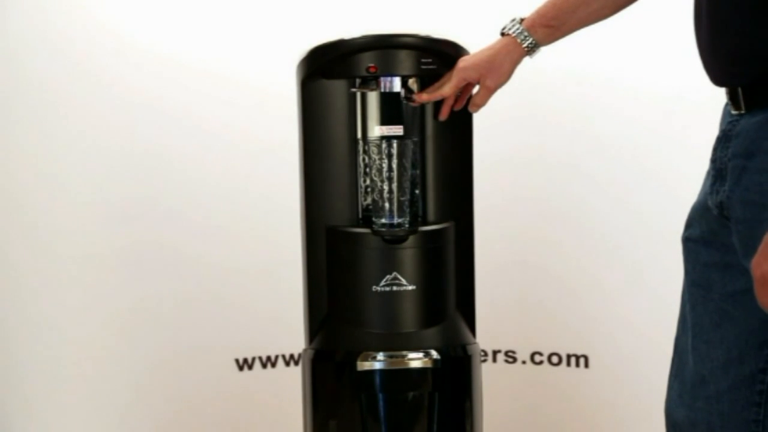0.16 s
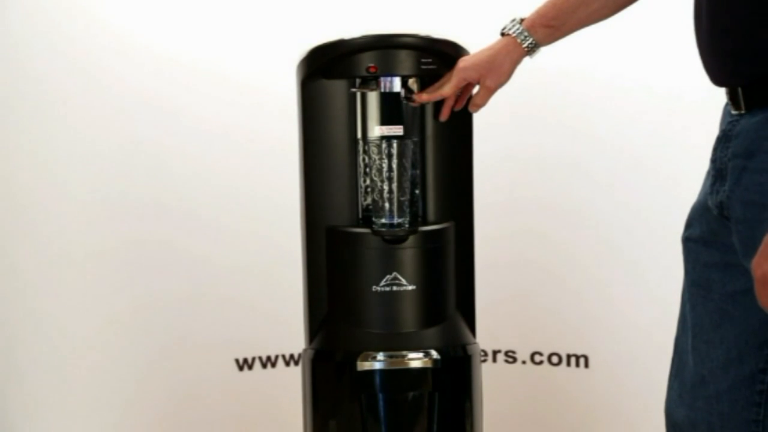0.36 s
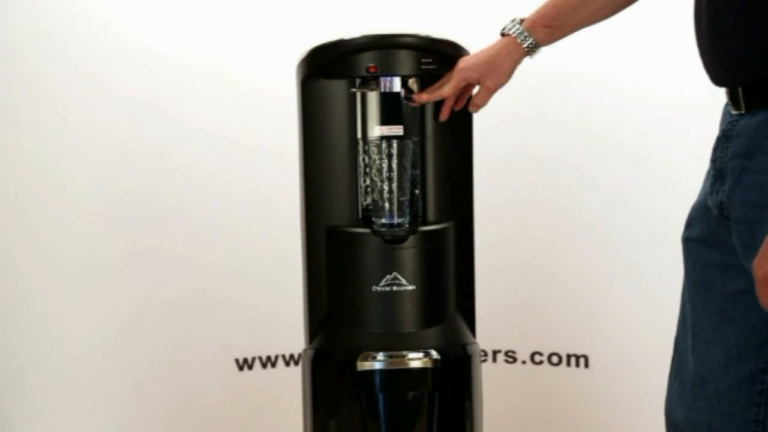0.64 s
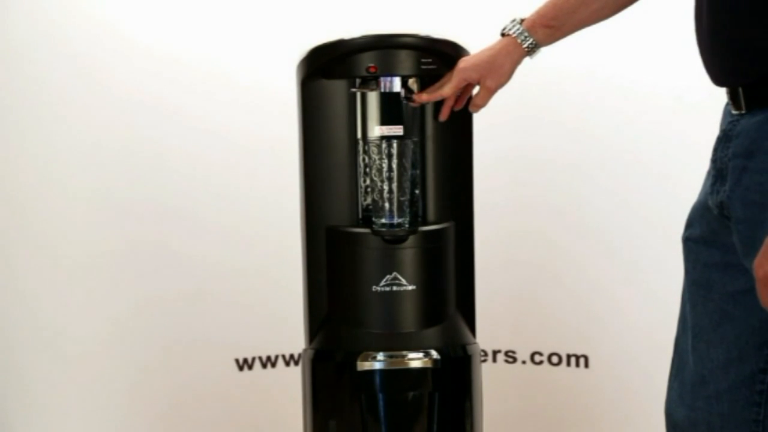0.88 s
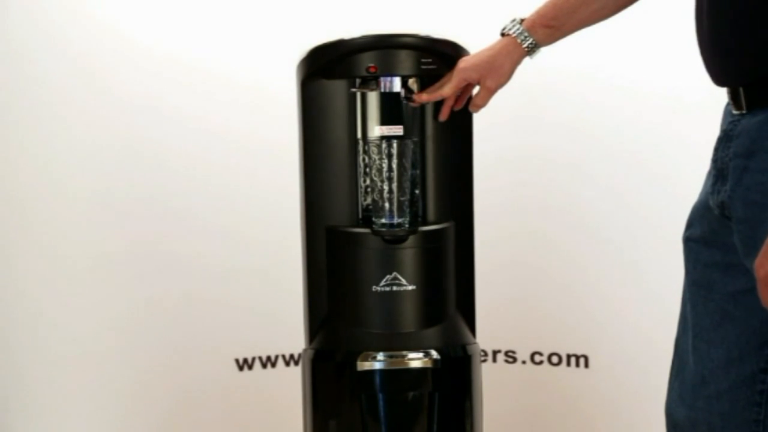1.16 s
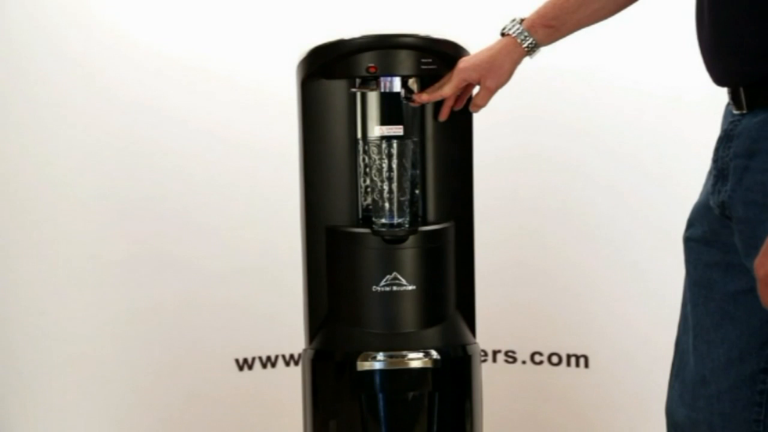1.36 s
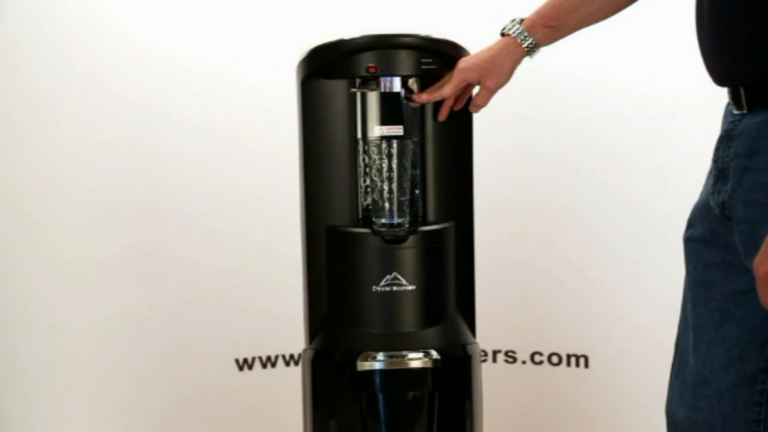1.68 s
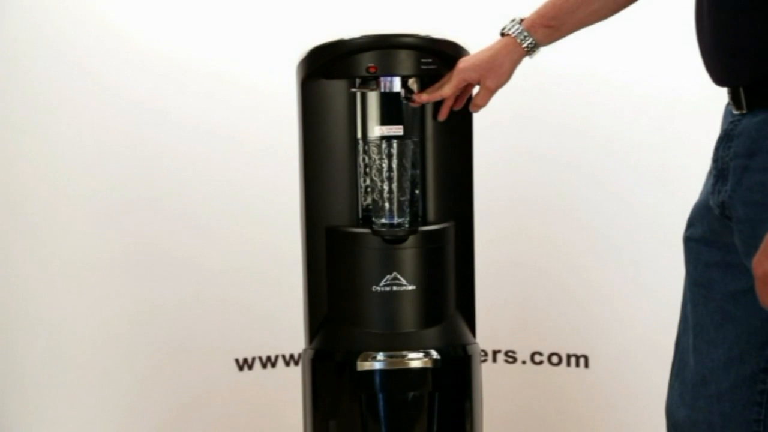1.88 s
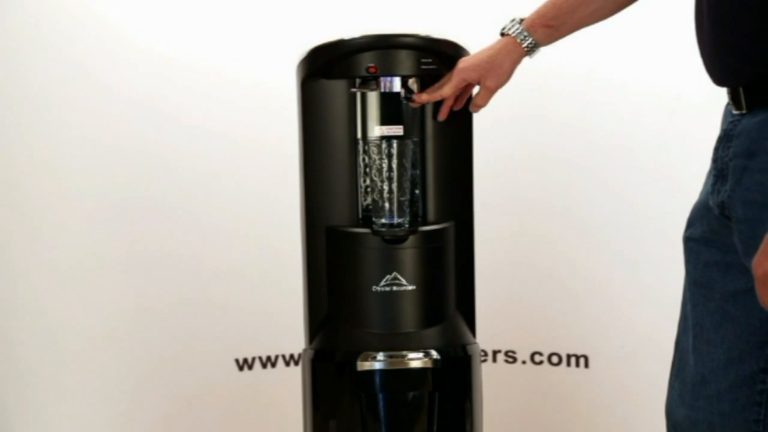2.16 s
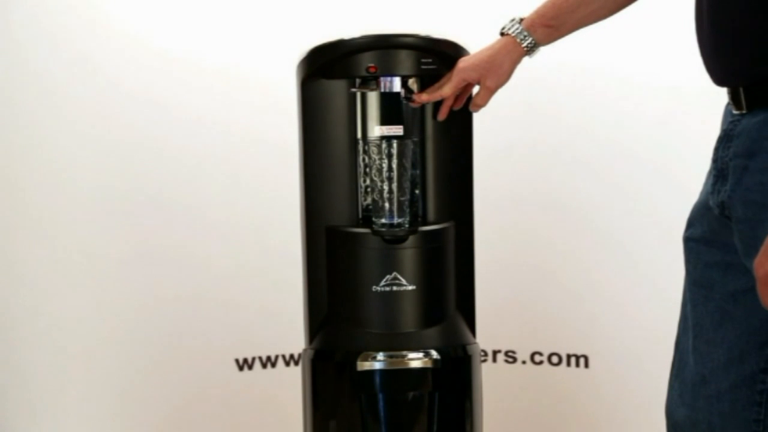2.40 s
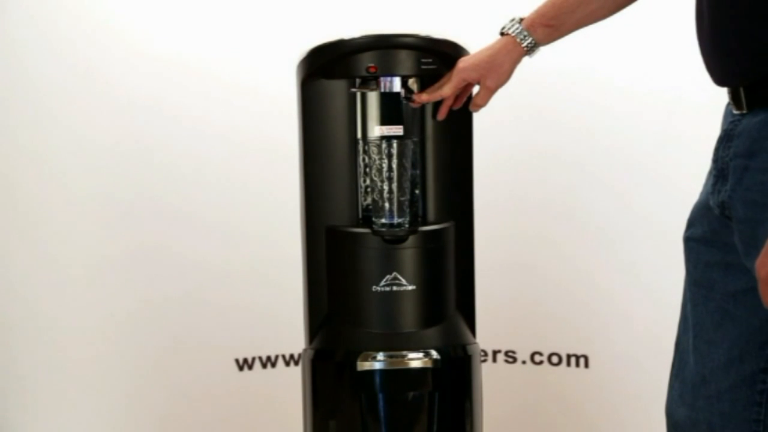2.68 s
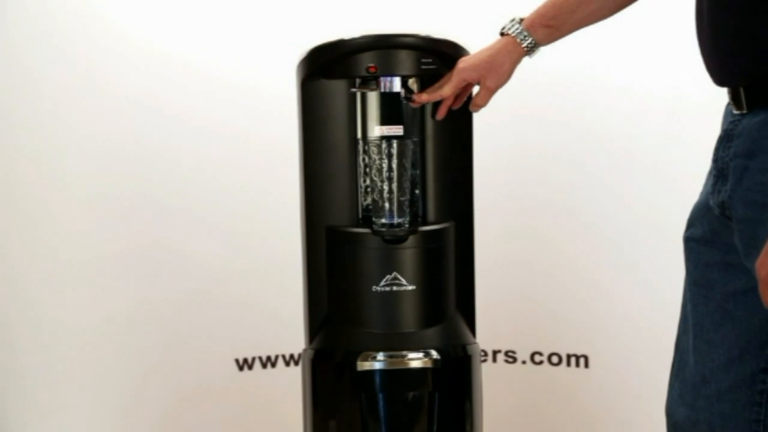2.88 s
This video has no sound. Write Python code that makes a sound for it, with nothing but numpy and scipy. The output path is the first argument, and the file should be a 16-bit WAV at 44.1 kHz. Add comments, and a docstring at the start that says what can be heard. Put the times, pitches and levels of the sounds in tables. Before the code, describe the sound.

A water cooler's electric pump hums steadily with a fast chugging buzz and a whine that keeps swelling and dipping. Underneath, a thin stream of water runs into a glass, fizzing softly with a few tiny splashes.

```python
"""The electric pump of a water cooler runs steadily while a thin stream fills a glass.
Its strokes, 25 a second, are a periodic force that drives the cabinet at harmonics of the stroke rate.
The motor whines in swells over faint steady tones and mains hum. Water rushes through the pump
and fizzes in the glass, where each bubble rings as a damped oscillator and the stream
throws a few small splashes. Both channels carry the same sound."""
import sys
import numpy as np
from scipy import signal
from scipy.fft import rfft, irfft
from scipy.io import wavfile
from scipy.ndimage import uniform_filter1d

SR = 44100
rng = np.random.default_rng(int(sys.argv[2]) if len(sys.argv) > 2 else 0)


def waveform_to_disk(signal):
    """Save audio, clipped to [-1, 1], as 16-bit WAV at the path in sys.argv[1]."""
    frames = np.transpose(np.atleast_2d(signal))
    scaled = np.clip(frames, -1, 1) * 32767
    samples = np.round(scaled).astype(np.int16)
    wavfile.write(sys.argv[1], SR, samples)


N = 134064

# Spray from the stream. Each row: start in seconds, level in dB before the envelope, band centre in Hz.
SPLASHES = [(.488, -53, 5300), (.773, -39.5, 3400), (1.134, -42, 4700), (1.162, -51, 4700),
            (1.211, -53, 5900), (1.883, -49, 5400), (1.918, -54, 5400), (2.952, -47, 5300)]
# Spectrum of the flow. Each row: frequency in Hz, relative spectral density in dB.
RUSH_SPECTRUM = [(20, -30.2), (45, -20), (75, -11.7), (105, -13.3), (150, -13.5), (240, -4), (330, -4.5),
                 (420, -7), (490, -6), (620, -.8), (820, -2.5), (890, .3), (980, -5), (1270, -5.5),
                 (1330, -4), (1410, -6), (1490, -12.8), (1750, -15), (2350, -12.8), (2850, -20.4),
                 (4050, -24.4), (4250, -27.4), (7000, -31.4), (10000, -35.5), (14000, -41.5)]
# Steady mains and motor tones. Each row: frequency in Hz, level in dB.
MOTOR_TONES = [(120, -57), (1086, -54), (1224, -47.5), (1410, -57), (1567, -65), (1902, -63), (1970, -59.5),
               (2449, -63)]
# Swells of the whine. Each row: centre in seconds, length in seconds, relative height in dB.
WHINE_SWELLS = [(.10, .2, -.5), (.24, .09, -6), (.54, .2, 1), (.88, .25, .3), (1.26, .19, .7),
                (1.64, .26, -1.5), (1.91, .16, 1), (2.16, .17, -1.5), (2.39, .16, 1), (2.66, .2, -1.5),
                (2.915, .17, 0)]
# Speed of the pump. Each row: time in seconds, rate in strokes per second.
STROKE_RATES = [(0, 25.28), (.45, 25.25), (1.0, 25.23), (1.55, 25.2), (2.1, 25.23), (2.55, 25.25),
                (3.04, 25.28)]
# Resonances of the cabinet's panels. Each row: natural frequency in Hz, bandwidth in Hz.
PANEL_MODES = [(306, 6), (329, 5), (331, 5), (552, 5), (606, 5), (751, 5), (756, 5), (869, 5)]
# The cabinet's response to the strokes. Each row: multiple of the stroke rate, relative level in dB.
CABINET_HARMONICS = [(6, -65), (7, -35.8), (8, -34.3), (9, -49), (10, -43.7), (11, -33.6), (12, -40),
                     (13, -45.5), (14, -45.7), (15, -36.3), (16, -48.5), (17, -59), (18, -46.5), (19, -56),
                     (20, -50), (21, -44.5), (22, -40.7), (23, -56), (24, -47.7), (25, -55), (26, -52),
                     (27, -53), (28, -50), (29, -62), (30, -49), (31, -55), (32, -55), (33, -52),
                     (34, -56.5), (35, -51.5), (38, -60), (39, -61)]


def undb(db):
    """Amplitude ratio: tenfold for every 20 dB."""
    return 10 ** (np.asarray(db) / 20)


def level(x, db):
    """Scaling to an rms level in dB."""
    return x * undb(db) / np.sqrt(np.mean(x ** 2))


def drift(rate_hz):
    """Moving averages smooth random steps into a drift with a spread near 1."""
    hold = int(SR / rate_hz)
    steps = np.repeat(rng.standard_normal(N // hold + 2), hold)
    return 1.38 * uniform_filter1d(uniform_filter1d(steps, hold), hold)[:N]


def noise(spectrum):
    """Spectral shaping: white noise weighted by (Hz, dB) points, at rms 1."""
    hz, db = np.array(spectrum).T
    bin_hz = np.maximum(np.arange(N // 2 + 1) * SR / N, 1)
    gain = undb(np.interp(np.log(bin_hz), np.log(hz), db))
    return level(irfft(rfft(rng.standard_normal(N)) * gain, N), 0)


def tone(t, hz, drift_rad):
    """Random phase modulation of a sine of rms 1."""
    return np.sqrt(2) * np.sin(2 * np.pi * hz * t + drift_rad * drift(12))


def bubbles(t, per_second=500, low_hz=1517, high_hz=9100, decay_cycles=3.8):
    """Bubble resonance: each rings briefly with rising pitch; smaller ones are higher and weaker."""
    size = 2048
    fizz, age = np.zeros(N + size), t[:size]
    for when, pitch, weakness in rng.random((int(per_second * N / SR), 3)):
        hz = low_hz * (high_hz / low_hz) ** pitch
        fade = np.exp(-age * hz / decay_cycles)
        gain = undb(-9 * weakness) * (low_hz / hz) ** 1.3
        rise = 1 + .093 * (1 - fade)
        start = int(when * N)
        fizz[start:start + size] += gain * fade * np.sin(2 * np.pi * hz * age * rise)
    return level(fizz[:N], db=-56.5)


def splashes(t, half_width_oct=.55, attack_s=.0025, decay_s=.014):
    """Impact noise: each burst of spray is a decaying band, higher when the drops are smaller."""
    spray, octaves = 0, np.linspace(-2, 2, 17)
    band_db = -10 * np.log10(1 + (octaves / half_width_oct) ** 8)
    for start, db, hz in SPLASHES:
        age = np.maximum(t - start, 0)
        envelope = (1 - np.exp(-age / attack_s)) * np.exp(-age / decay_s)
        spray += undb(db) * envelope * noise(list(zip(hz * 2 ** octaves, band_db)))
    return spray


def hum_swell(t, centre_s=1.4, length_s=.12):
    """A Gaussian envelope on a wavering tone: a brief, faint swell in the low hum."""
    envelope = np.exp(-(2 * (t - centre_s) / length_s) ** 2)
    return undb(-36) * envelope * tone(t, hz=322, drift_rad=2.4)


def rush(level_db=-35, flicker_db=.33):
    """Turbulence: the churning flow makes broadband noise, coloured by the cabinet."""
    return noise(RUSH_SPECTRUM) * undb(level_db + flicker_db * drift(29.77))


def motor(t, wobble_db=1.6, band_hz=1330, spread_hz=49):
    """Amplitude modulation: a whine and a noise band swell together over faint steady tones."""
    steady = sum(undb(db + wobble_db * drift(8)) * tone(t, hz, drift_rad=.3) for hz, db in MOTOR_TONES)
    swells = sum(undb(db) * np.exp(-(2 * (t - at) / length) ** 4) for at, length, db in WHINE_SWELLS)
    envelope = .24 + .76 * swells  # the whine never quite stops
    bin_hz = np.arange(N // 2 + 1) * SR / N
    band = np.exp(-((bin_hz - band_hz) / spread_hz / 2) ** 2)
    noisy_edge = level(irfft(rfft(rng.standard_normal(N)) * band, N), db=-49)
    whine = undb(-35.7) * tone(t, hz=1269.2, drift_rad=.15)
    return steady + envelope * (whine + noisy_edge)


def stroke_count(t, first_stroke_s=.03854, jitter_strokes=.002):
    """Phase is the integral of rate: the count, nearly even, passes a whole number at each push."""
    strokes = np.cumsum(np.interp(t, *np.array(STROKE_RATES).T)) / SR
    return strokes - np.interp(first_stroke_s, t, strokes) + jitter_strokes * drift(7)


def panel_lag(hz):
    """Summed phase lag of driven resonators, in radians: above resonance a panel opposes the push."""
    return sum(np.arctan2(hz * width, centre ** 2 - hz ** 2) for centre, width in PANEL_MODES)


def pump(strokes, waver_db_per_hz=.001):
    """Forced vibration: each stroke is a swell of pressure that shakes the panels, so the hum chugs."""
    stroke_hz = np.mean(np.diff(strokes)) * SR
    hum = 0
    for harmonic, db in CABINET_HARMONICS:
        hz = harmonic * stroke_hz
        waver_db = waver_db_per_hz * hz * drift(14)
        hum += undb(db + waver_db) * np.cos(2 * np.pi * harmonic * strokes - panel_lag(hz))
    return level(hum, db=-27.7)


def scene():
    """Superposition: pump, motor and water add, the same in both channels."""
    t = np.arange(N) / SR
    cooler = pump(stroke_count(t)) + motor(t) + rush() + bubbles(t) + splashes(t) + hum_swell(t)
    return np.array([cooler, cooler])


def record(dry):
    """Low-pass filtering: a steep elliptic filter removes the highest treble."""
    cutoff_hz = 14100
    return signal.sosfilt(signal.ellip(10, .2, 80, cutoff_hz, fs=SR, output="sos"), dry)


dry = scene()
out = record(dry)
waveform_to_disk(out)
```